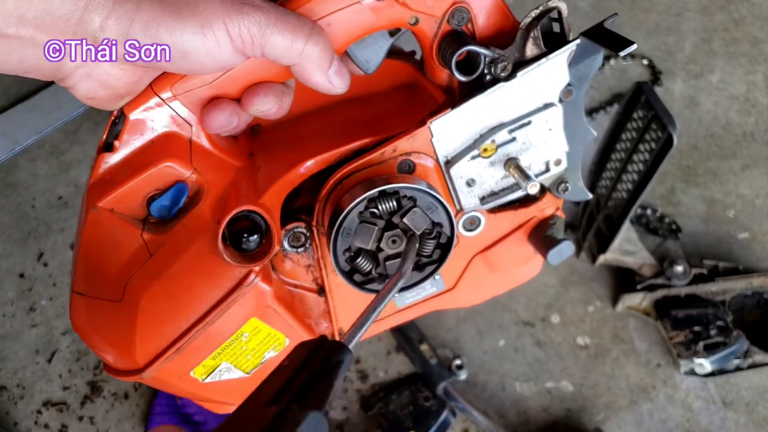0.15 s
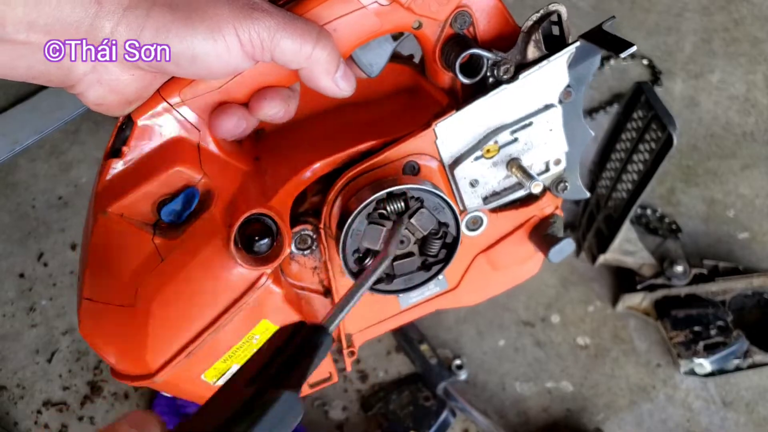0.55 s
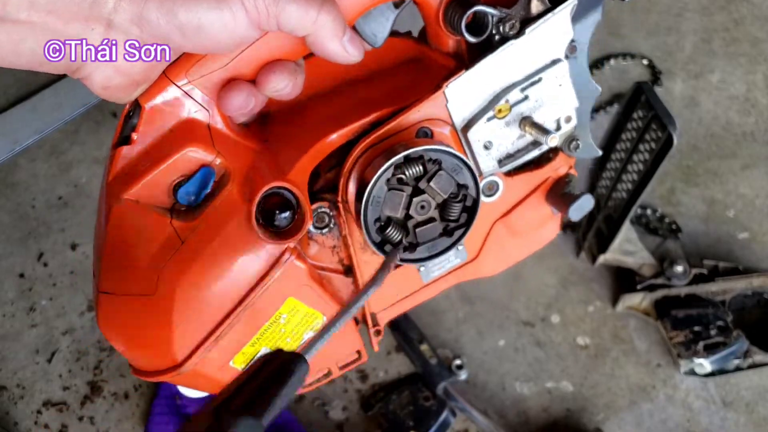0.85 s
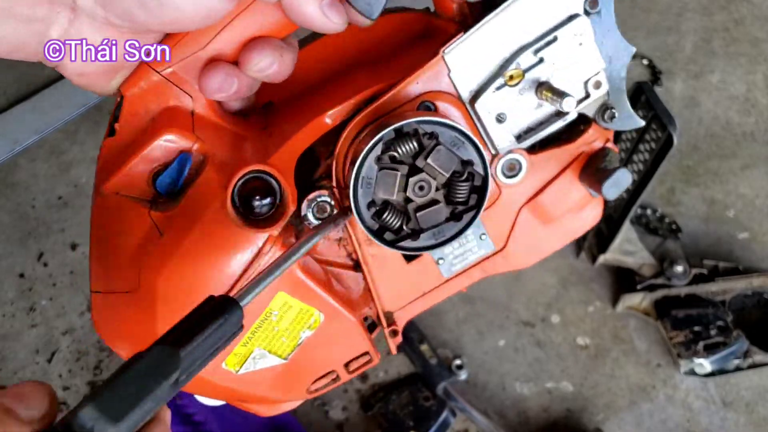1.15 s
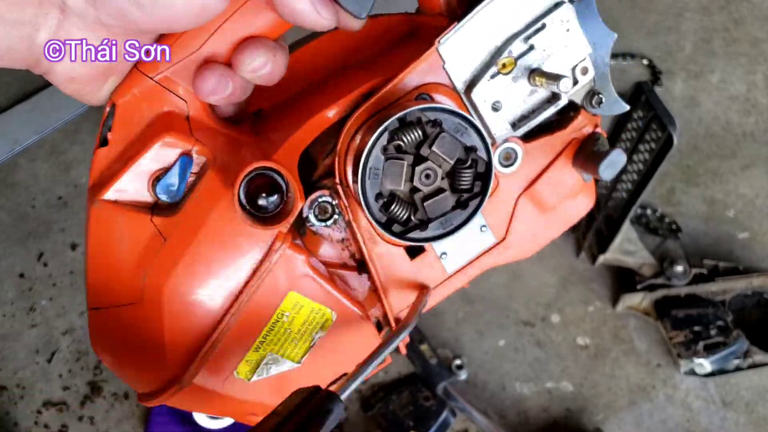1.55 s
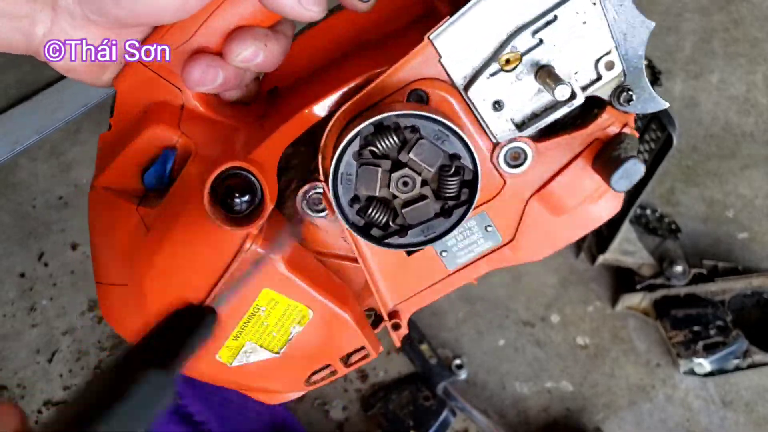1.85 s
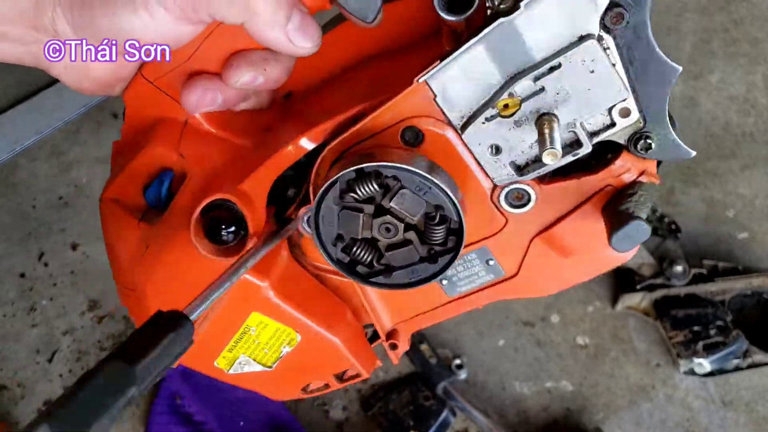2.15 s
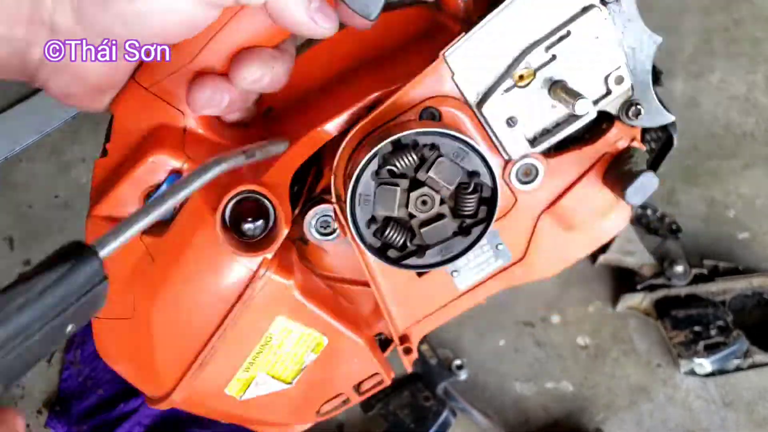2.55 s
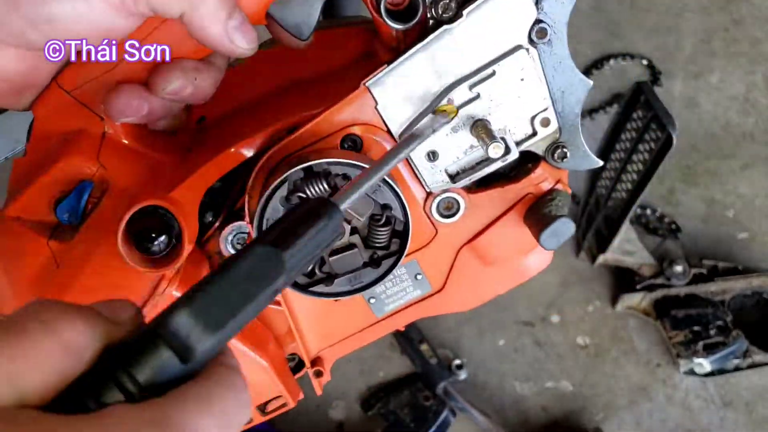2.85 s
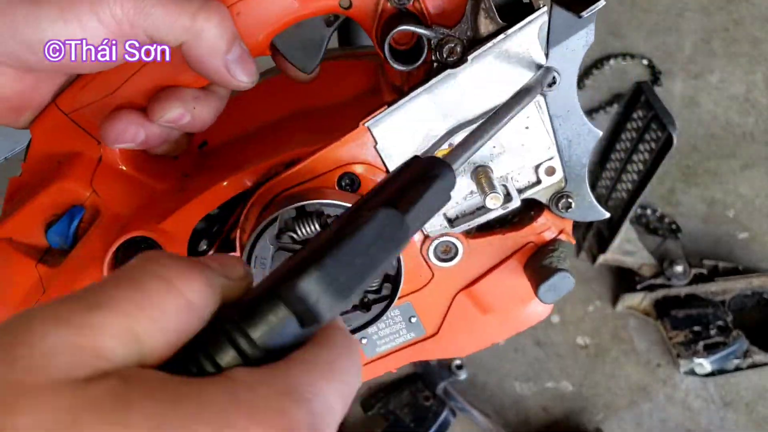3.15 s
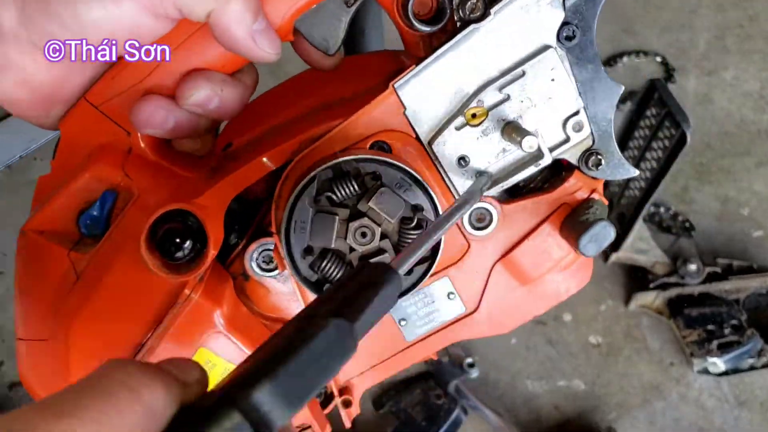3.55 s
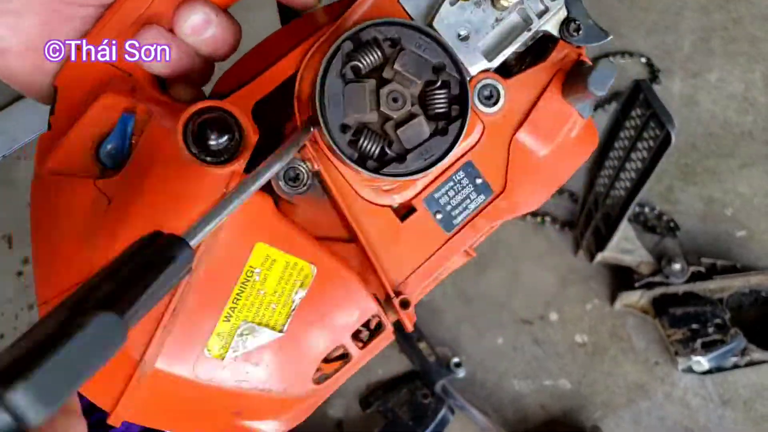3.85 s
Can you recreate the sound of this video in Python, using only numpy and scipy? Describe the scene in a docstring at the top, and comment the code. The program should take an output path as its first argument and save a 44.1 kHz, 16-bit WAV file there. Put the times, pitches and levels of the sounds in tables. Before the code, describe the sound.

Hissing air from a blow gun cleans a chainsaw: two long blasts, then shorter, gusty puffs.

```python
"""A compressed-air gun sweeps over a small machine in a workshop: two long blasts, then short puffs.
The turbulent jet hisses, and single bands flare as it crosses edges and hollows. The trigger clicks.
Deflected air buffets the two microphone ports with rumble and gusts. Midway through the second blast
the sound cuts abruptly to a drier, windier scene with a different quiet background."""
import sys
import numpy as np
from scipy import signal
from scipy.fft import rfft, irfft
from scipy.io import wavfile
from scipy.ndimage import uniform_filter1d

SR = 44100
rng = np.random.default_rng(int(sys.argv[2]) if len(sys.argv) > 2 else 0)


def generate_wav(signal):
    """Clip the signal to [-1, 1] and save it as 16-bit WAV at the path in sys.argv[1]."""
    frames = np.transpose(np.atleast_2d(signal))
    scaled = np.clip(frames, -1, 1) * 32767
    pcm = np.round(scaled).astype(np.int16)
    wavfile.write(sys.argv[1], SR, pcm)


N = 176400
CUT_S = 2.084  # abrupt cut mid-hiss to the drier, windier scene


def jet(band_gains):
    """Turbulent hiss, patchy and rippled by near surfaces, in four bands, highest first."""
    spectrum = [(290, -22), (500, -28), (680, -14.5), (2120, -10.5), (4390, -9), (6510, -10), (9230, -7.5),
                (14700, -1)]  # freq_hz, density_db
    tilt = [(950, 1.5), (15000, 1.5)]  # freq_hz, left_minus_right_db
    coherence_before = [(700, 0.89), (2400, 0.74), (4800, 0.37), (8000, 0.24), (12000, 0.15), (15000, 0.1)]  # freq_hz, left_right_coherence
    coherence_after = [(700, 0.39), (3400, 0.7), (6500, 0.78), (10000, 0.28), (15000, 0.1)]  # freq_hz, left_right_coherence
    crossovers_hz, blend = (11850, 6350, 3100), 0.37
    patch_db, ripple_db, flicker_db = 1.78, 0.9, 1.2
    lead_before_s, lead_after_s = 52e-6, 15e-6  # the left port hears the jet first
    frames, hz = N // 128 + 5, np.fft.rfftfreq(512, 1 / SR)
    left_re, left_im, side_re, side_im, patches, ripple = rng.standard_normal((frames, 257, 6)).T
    patches = unit_rms(uniform_filter1d(uniform_filter1d(patches, 8, axis=0), 14, axis=1))
    ripple = unit_rms(uniform_filter1d(uniform_filter1d(ripple, 3, axis=0), 50, axis=1))
    after = (np.arange(frames) - 2) * 128 > CUT_S * SR
    coherence = np.where(after, curve(coherence_after, hz)[:, None], curve(coherence_before, hz)[:, None])
    lag_rad = 2 * np.pi * np.outer(hz, np.where(after, lead_after_s, lead_before_s))
    left, side = left_re + 1j * left_im, side_re + 1j * side_im
    right = coherence * left * np.exp(-1j * lag_rad) + np.sqrt(1 - coherence ** 2) * side
    tilt_db = curve(tilt, hz)[:, None] / 2
    colour = amp(curve(spectrum, hz)[:, None] + patch_db * patches + ripple_db * ripple)
    noise = np.array([left * amp(tilt_db), right * amp(-tilt_db)]) * colour
    highpasses = [0.5 + 0.5 * np.tanh(np.log((hz + 1) / edge) / blend) for edge in crossovers_hz]
    masks = np.diff(highpasses, axis=0, prepend=0, append=1)
    bands = [signal.istft(noise * mask[:, None], nperseg=512, noverlap=384)[1][:, :N] for mask in masks]
    hiss = sum(gain * band / np.std(band.mean(0)) for gain, band in zip(band_gains, bands))
    return hiss * amp(flicker_db * wander(samples=150, channels=1))


def nozzle_gains():
    """Hiss level and nozzle aim set five gains: four jet bands, highest first, then wind."""
    stretches = [
        [(0, -23.5), (.2, -22), (.3, -24), (.5, -21.5), (.62, -24.5), (.72, -25), (.77, -22), (.805, -25),
         (.83, -49), (.85, -48)],
        [(1.268, -60.5), (1.29, -52), (1.325, -34.5), (1.5, -37.5), (1.65, -37), (1.77, -37.5), (1.83, -33.5),
         (2.04, -31.5), (2.083, -27.5)],
        [(2.086, -48.5), (2.27, -47), (2.3, -41.5), (2.38, -43), (2.41, -42.5), (2.53, -42.5), (2.57, -54.5),
         (2.61, -78)],
        [(2.69, -67), (2.702, -43.5), (2.79, -42.5), (2.918, -45.5), (2.926, -50.5), (2.996, -47), (3.01, -68),
         (3.045, -77)],
        [(3.056, -54), (3.065, -40.5), (3.105, -38), (3.116, -57), (3.136, -60), (3.147, -43), (3.27, -45),
         (3.295, -58.5), (3.34, -101)],
        [(3.364, -72), (3.374, -48.5), (3.6, -43), (3.66, -47), (3.7, -40), (3.72, -67), (3.76, -95)],
        [(3.794, -56), (3.81, -50), (3.98, -52), (4, -74)],
    ]  # stretches of hiss, split at pauses and the cut: time_s, level_db
    aim = [(0, -7.5, -10, -26, -32), (.55, -9, -11, -23, -27.5), (0.819, -10.5, -7.5, -29, -26.5),
           (1.301, -3.5, -7, -6, -26.5), (1.75, 1, -4, -2.5, -31.5), (2.081, -4, -16, -13.5, -21.5),
           (2.092, -0.5, -3.5, -11.5, -14.5), (2.55, -4.5, -11, -20, -22.5), (2.7, -5.5, -16.5, -19, -19),
           (3.0, -6.5, -16, -13.5, -12.5), (3.15, -18.5, -22, -27, -24), (3.28, -3, -15.5, -15.5, -9),
           (3.38, 2, -3, -19, -13), (3.57, -3, -9, -20, -15.5), (3.7, -10.5, -16.5, -13, 3.5),
           (3.82, 2.5, -6.5, -14, -13)]  # relative to the hiss: time_s, high_db, mid_db, low_db, wind_db
    t, hiss_db = np.arange(N) / SR, np.full(N, -150.)
    for stretch in stretches:
        time_s, level_db = np.transpose(stretch)
        hissing = (t >= time_s[0]) & (t <= time_s[-1])
        hiss_db[hissing] = np.interp(t[hissing], time_s, level_db)
    time_s, *offsets_db = np.transpose(aim)
    top_db = hiss_db - 3
    aimed_db = [hiss_db + np.interp(t, time_s, offset) for offset in offsets_db]
    return uniform_filter1d(amp([top_db] + aimed_db), size=40, axis=1)


def flares():
    """The jet crosses an edge or hollow: noise swells in one resonance."""
    crossings = [(0.03, 0.35, -35, 4570, 1194), (0.513, 0.13, -20, 12830, 3500),
                 (0.681, 0.033, -18, 12800, 4010), (1.305, 0.45, -38.5, 2830, 353),
                 (1.398, 0.12, -33, 6700, 2500), (1.811, 0.14, -38, 2870, 450),
                 (1.905, 0.05, -24, 12800, 4000), (2.291, 0.05, -34, 6200, 2430),
                 (3.26, 0.017, -43.5, 2450, 3060), (3.459, 0.05, -38.5, 10100, 5000)]  # start_s, length_s, level_db, centre_hz, width_hz
    coherent_below_hz = 11850
    out = np.zeros((2, N))
    for start_s, length_s, level_db, centre_hz, width_hz in crossings:
        progress = np.linspace(0, 1, int(length_s * SR))
        swell = np.sin(np.pi * progress ** 0.43)
        noise = rng.standard_normal((3, SR // 2))[:, :len(swell)]
        drive = noise[:2] + 2.1 * noise[2] * (centre_hz < coherent_below_hz)
        ring = signal.lfilter(*signal.iirpeak(centre_hz, centre_hz / width_hz, SR), drive)
        out[:, round(start_s * SR):][:, :len(swell)] += amp(level_db) * unit_rms(ring) * swell
    return out


def trigger():
    """Valve clicks: a noisy snap and a faint rattle ring the gun's modes."""
    clicks = [(1.19, -58.5, 3500), (1.202, -61, 4540), (1.224, -59.5, 3030), (1.259, -50, 15000),
              (1.2662, -44, 2500), (3.121, -48, 15000), (3.364, -65, 14000), (3.781, -53, 14000)]  # start_s, peak_db, cutoff_hz
    modes = [(1190, 1, 0.01), (2320, -14, 0.027), (3470, -9.5, 0.0093), (8700, -7, .01), (11730, 2, 0.017)]  # pitch_hz, level_db, t60_s
    snap_db, snap_t60_s = 6.5, 0.026
    rattle_before_db, rattle_after_db, rattle_t60_s = -15.5, -23, 0.3
    t, out = np.arange(2000) / SR, np.zeros(N)
    ring = sum(amp(db - 60 * t / t60_s) * np.sin(2 * np.pi * hz * t) for hz, db, t60_s in modes)
    for start_s, peak_db, cutoff_hz in clicks:
        rattle_db = rattle_after_db if start_s > CUT_S else rattle_before_db
        decay = amp(-60 * t / snap_t60_s) + amp(rattle_db - 60 * t / rattle_t60_s)
        grit = rng.standard_normal(len(t)) * decay
        tick = unit_rms(np.convolve(grit, ring)[:len(t)]) + amp(snap_db) * unit_rms(grit)
        tick = signal.lfilter(*signal.butter(2, [700, cutoff_hz], "band", fs=SR), tick)
        out[round(start_s * SR):][:len(t)] += amp(peak_db) * unit_peak(tick)
    return out


def wind(gain):
    """Deflected air at the ports: lumpy low turbulence, independent at each, plus gusts."""
    spectrum_before = [(25, -37.5), (55, -15), (120, -8.5), (300, -8.5), (700, -12.5), (2000, -54.5)]  # freq_hz, density_db
    spectrum_after = [(40, -37), (110, -17.5), (220, 2), (480, 0.5), (1000, -3), (2500, -19), (6000, -44.5)]  # freq_hz, density_db
    gusts = [(0.279, -37.5, -8), (0.372, -38.5, 23), (0.442, -31, 7), (0.643, -38.5, 13),
             (0.758, -36.5, 18), (0.793, -43, 4), (1.316, -40, 2), (1.432, -39, 13), (1.827, -37.5, 6),
             (1.911, -29, 8), (2.049, -33, 2), (2.172, -45, 29), (2.696, -38.5, -6), (2.844, -38.5, 2),
             (3.008, -42, -8), (3.084, -30.5, 3.5), (3.0991, -32, 24), (3.204, -40, 2), (3.216, -36, 12),
             (3.26, -40, -2), (3.513, -36.5, 8), (3.603, -24, 12), (3.629, -23.5, 22), (3.6715, -18, 26),
             (3.6882, -25, 9), (3.814, -36.5, 0), (3.847, -42.5, -3)]  # start_s, peak_db, left_minus_right_db
    lump_db, port_db = 5, [[5.5], [-5.5]]
    after = np.arange(N) > CUT_S * SR
    air = np.where(after, stereo_noise(spectrum_after), stereo_noise(spectrum_before))
    lumps = unit_rms(amp(lump_db * wander(samples=300, channels=2)))
    out = air * gain * lumps * amp(port_db)
    for start_s, peak_db, pan_db in gusts:
        if start_s > CUT_S:
            hit, end = gust(spectrum_after, pitch_hz=308, crest_s=0.0037, crack_db=4.5), N
        else:
            hit = gust(spectrum_before, pitch_hz=72, crest_s=0.0058, crack_db=-0.5)
            end = round(CUT_S * SR)
        pan = np.array([[1], [amp(-pan_db)]]) * 2 / (1 + amp(-pan_db))
        span = out[:, round(start_s * SR):end][:, :hit.shape[1]]
        span += amp(peak_db) * pan * hit[:, :span.shape[1]]
    return out


def gust(spectrum, pitch_hz, crest_s, crack_db):
    """Air strikes the ports: a short throb of sagging pitch with a crack on its crest."""
    pitch_spread, sag, spike_db, tilt_db_per_octave = 0.19, 0.11, 9.5, 2
    samples = 4096
    hz, age = np.fft.rfftfreq(samples, 1 / SR), np.arange(samples) / SR / crest_s
    noise, scatter = rng.standard_normal((2, 2, samples))
    swell = age * np.exp(1 - age)
    glide_hz = pitch_hz * np.exp(pitch_spread * scatter[:, :1] - sag * (age - 1))
    throb = swell * np.sin(2 * np.pi * (np.cumsum(glide_hz, axis=1) / SR + noise[:, :1]))
    colour = amp(curve(spectrum, hz) + tilt_db_per_octave * np.log2(hz + 1))
    pulse = np.fft.fftshift(irfft(colour)) * np.hanning(samples)
    spikes = noise * amp(spike_db * scatter) * swell ** 5
    crack = signal.fftconvolve(spikes, pulse[None], "same", axes=1)
    return unit_peak(throb + amp(crack_db) * unit_peak(crack))


def workshop_echo(direct, t60_scale):
    """Room echo: a noise tail that dies band by band."""
    decay = [(300, 0.77), (2600, .7), (4300, 0.58), (8000, 0.47), (15000, 0.52)]  # freq_hz, base_t60_s
    hz, t, noise = signal.stft(rng.standard_normal((2, SR // 2)), SR, nperseg=256)
    t60_s = t60_scale * curve(decay, hz)[:, None]
    tail = signal.istft(noise * amp(-60 * t / t60_s), SR, nperseg=256)[1]
    return signal.fftconvolve(direct, tail / np.linalg.norm(tail[0]), axes=1)[:, :N]


def background():
    """Quiet workshop: rumble and a faint whine before the cut, low-mid noise after."""
    spectrum_before = [(18, -40.5), (30, 0.5), (80, 1.5), (551, -17.5), (5000, -35.5), (6500, -68)]  # freq_hz, density_db
    spectrum_after = [(18, -56), (30, -43), (270, -8), (374, -19), (8000, -52.5), (10400, -82)]  # freq_hz, density_db
    whine = [(5329, -80)]  # pitch_hz, peak_db
    pitch_hz, peak_db = whine[0]
    noise_db, t = -77, np.arange(N) / SR
    tone = amp(peak_db) * np.sin(2 * np.pi * pitch_hz * t)
    before = amp(noise_db) * stereo_noise(spectrum_before) + tone
    return np.where(t > CUT_S, amp(noise_db) * stereo_noise(spectrum_after), before)


def amp(db):
    return 10 ** (np.asarray(db) / 20)


def unit_rms(x):
    return x / np.sqrt(np.mean(x ** 2) + 1e-20)


def unit_peak(x):
    return x / abs(x).max(-1, keepdims=True)


def curve(points, hz):
    """Interpolate over log frequency."""
    freq_hz, value = np.transpose(points)
    return np.interp(np.log(hz + 1), np.log(freq_hz + 1), value)


def wander(samples, channels):
    """Smooth random drift, rms 1."""
    noise = rng.standard_normal((channels, N))
    return unit_rms(uniform_filter1d(uniform_filter1d(noise, samples, 1), samples, 1))


def stereo_noise(spectrum):
    """Shaped noise, rms 1."""
    white = rfft(rng.standard_normal((2, N)))
    return unit_rms(irfft(white * amp(curve(spectrum, np.fft.rfftfreq(N, 1 / SR))), N))


def scene():
    """Air gun, echo, wind and background."""
    *band_gains, wind_gain = nozzle_gains()
    gun = jet(band_gains) + flares() + trigger()
    after = np.arange(N) > CUT_S * SR
    echo_after = amp(-41) * workshop_echo(gun * after, t60_scale=1)
    echo_before = amp(-17) * workshop_echo(gun, t60_scale=0.7)
    return gun + np.where(after, echo_after, echo_before) + wind(wind_gain) + background()


def record(dry):
    """Steep low-pass."""
    cutoff_hz = 15520
    lowpass = signal.firwin(511, cutoff_hz, window=("kaiser", 9), fs=SR)
    return signal.oaconvolve(dry, lowpass[None], "same")


dry = scene()
out = record(dry)
generate_wav(out)
```